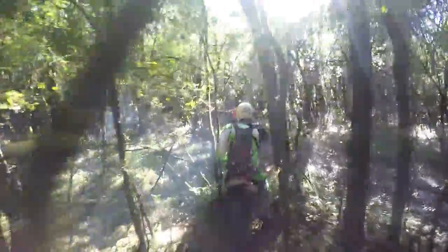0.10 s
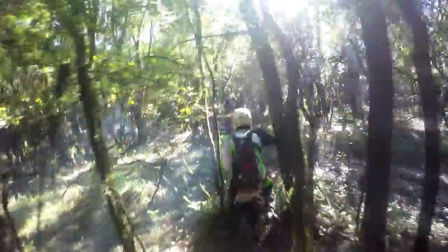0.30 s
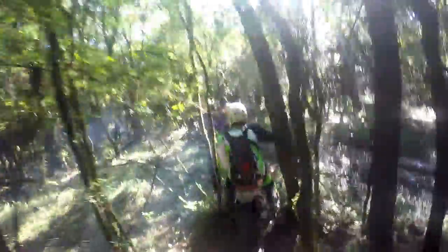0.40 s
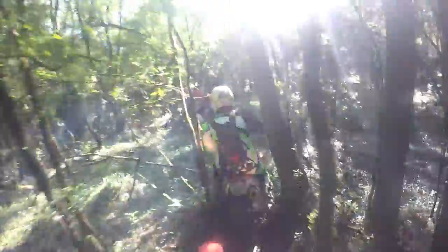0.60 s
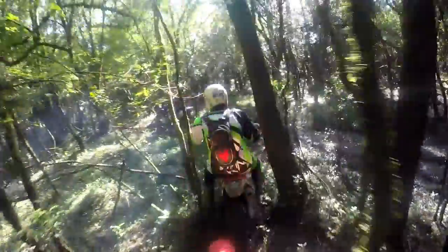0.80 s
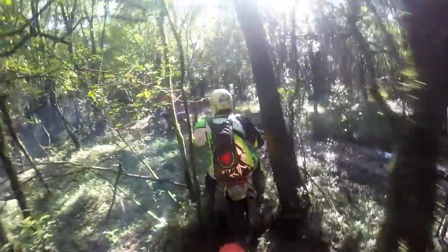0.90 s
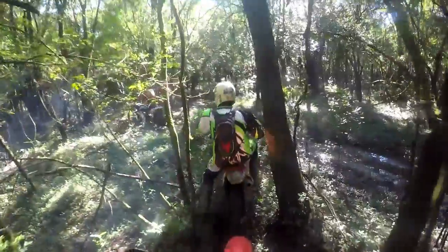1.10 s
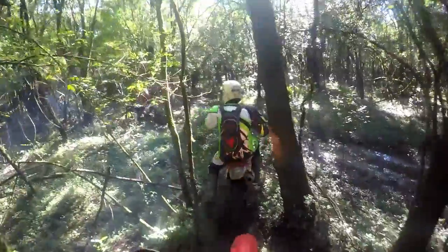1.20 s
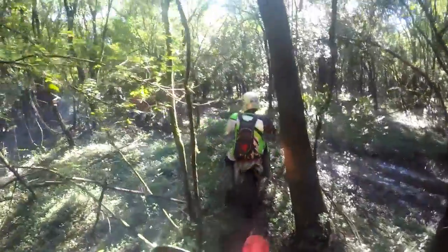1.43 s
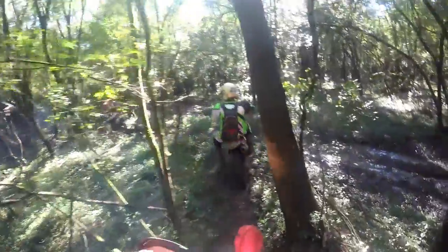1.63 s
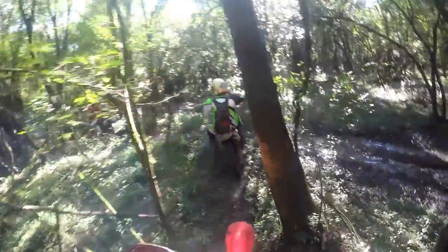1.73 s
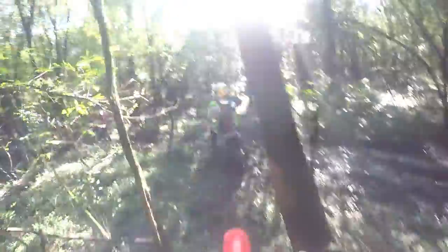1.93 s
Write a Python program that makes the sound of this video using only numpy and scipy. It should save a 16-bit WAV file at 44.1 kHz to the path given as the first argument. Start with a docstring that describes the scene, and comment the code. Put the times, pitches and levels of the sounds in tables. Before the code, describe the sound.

Close single-cylinder dirt bike engine revving three times in a wood, then settling to idle.

```python
"""In a wood, microphone at the rider's seat of a single-cylinder four-stroke trail bike.
The engine ticks over, gets three blips of throttle and sinks back to idle. Close by, every firing
thumps the silencer and sends a burst of gas ringing through the pipe; ground and trunks echo that bark.
Underneath are a dull knock from the engine case, the whirr of gears and chain, a faint gear whine,
twigs under the tyres and the low rumble of the moving bike."""
import sys
import numpy as np
from scipy import signal
from scipy.fft import rfft, irfft
from scipy.io import wavfile
from scipy.ndimage import uniform_filter1d

SR = 44100
rng = np.random.default_rng(int(sys.argv[2]) if len(sys.argv) > 2 else 0)


def materialize(psi):
    """Save the field psi as 16-bit PCM at rate SR to the path in sys.argv[1].

    A 1-D psi becomes a single channel; in a 2-D psi each row is a channel.
    """
    bounded = np.clip(np.atleast_2d(psi).T, -1, 1)
    quanta = np.round(bounded * 32767).astype(np.int16)
    wavfile.write(sys.argv[1], SR, quanta)


N = 85995
T = np.arange(N) / SR

# rumble of the moving bike (frequency [Hz], relative density [dB]) and (time [s], level [dB])
RUMBLE_SPECTRUM = [(15, -6.5), (30, -3), (70, 3), (120, -4.5), (200, -14.5), (320, -20), (600, -48),
                   (1500, -64)]
RUMBLE_DB = [(0, -36), (.2, -34.5), (.29, -31.5), (.38, -36.5), (.6, -30), (1.05, -30), (1.35, -28.5),
             (1.6, -31), (1.95, -38.5)]
# twigs and leaves under the tyres (frequency [Hz], relative density [dB]) and (time [s], level [dB])
TWIG_SPECTRUM = [(800, -25), (2500, 11.5), (4500, 7), (8200, -3), (12000, -11), (15500, -38)]
TWIG_DB = [(0, -48), (.35, -51), (1.3, -45), (1.5, -46.5), (1.68, -44), (1.95, -61)]
# gear whine as the bike rolls on (time [s], pitch [Hz], level [dB])
WHINE_GLIDE = [(1.35, 4350, -68), (1.52, 4364, -55), (1.595, 4110, -43.5), (1.66, 4110, -55),
               (1.8, 4010, -51), (1.95, 3800, -66)]
# whirr of gears and chain (frequency [Hz], relative density [dB]) and (time [s], level [dB])
WHIRR_SPECTRUM = [(200, -27), (330, 1.5), (520, -0.5), (780, -5), (1080, 5.5), (1300, -3), (1540, 7),
                  (1840, -0.5), (2100, 1), (2360, -11), (2740, 8), (3300, -8), (4500, -2.5), (5600, -13.5),
                  (8000, -15), (11000, -32), (15500, -26)]
WHIRR_DB = [(0, -45.5), (.4, -43.5), (.7, -35.5), (1.15, -40), (1.4, -41.5), (1.65, -42.5), (1.95, -43)]
# knock of the engine case (frequency [Hz], relative density [dB]) and (time [s], level [dB])
KNOCK_SPECTRUM = [(50, -24), (110, 7), (180, -0.5), (280, 4.5), (400, -20.5), (700, -66), (2000, -70)]
KNOCK_DB = [(0, -53.5), (.4, -38.5), (1.15, -40.5), (1.4, -43.5), (1.65, -43), (1.95, -47.5)]
# engine speed (time [s], firing rate [1/s])
FIRING_RATE = [(0.0, 24.81), (0.148, 24.19), (0.392, 27.51), (0.451, 20.54), (0.497, 24.44), (0.55, 24.77),
               (0.638, 30.3), (0.723, 36.35), (0.814, 44.69), (0.861, 42.86), (0.919, 37.33),
               (1.001, 43.89), (1.06, 48.07), (1.151, 39.14), (1.259, 33.91), (1.34, 38.11), (1.629, 19.98),
               (1.95, 19.99)]
# strength of the firings as the throttle opens and shuts (time [s], thump gain [dB], bark gain [dB])
THROTTLE_DB = [(0, -13.5, -30.5), (.125, -20.5, -22.5), (.39, -16, -34.5), (.435, -6.5, -18),
               (.48, -3.5, -10), (.522, -2.5, -12), (.563, 0, -6.5), (.6, 0, -5.5), (.634, -0.5, -7),
               (.666, 1, -5.5), (.696, 2.5, .5), (.725, 2.5, -1), (.75, 3, 0.5), (.824, 2.5, .5),
               (.845, 1.5, -3), (.868, -27, -33), (.892, 0, -10), (.918, -2.5, -12), (.944, 1, -5),
               (.969, 4, -1), (1.016, 3.5, 1), (1.06, 2.5, 0), (1.08, 2.5, -7), (1.102, -22, -39),
               (1.203, -10, -24.5), (1.23, -2, -11), (1.26, 0.5, -7), (1.316, 1.5, -5), (1.343, -1, -8.5),
               (1.37, -4.5, -19), (1.41, -18.5, -33), (1.95, -23.5, -28)]
# low modes of the silencer (frequency [Hz], base level [dB], decay [s], share of thump gain [dB/dB])
SILENCER_MODES = [(85.4, -18, 0.014, 0.41), (158, -19.5, 0.0062, 0.51), (255, -23, 0.0049, 1.07),
                  (368.4, -16, 0.0037, 2.05), (540, -22.5, 0.00094, 0.6)]
# resonances of pipe and bodywork
# (frequency [Hz], width [Hz], relative gain at low revs [dB], relative gain at high revs [dB])
PIPE_RESONANCES = [(931, 49, -4, -13), (1080, 135, -3, -2), (1184, 192, -0.5, 1), (1537, 240, -4, 5),
                   (1844, 285, -7, -1), (2032, 120, -4.5, -5.5), (2546, 290, -4, -11.5),
                   (2682, 205, -2.5, -3), (3460, 2550, -12, -12.5), (4740, 600, -8.5, -13),
                   (6010, 420, -18, -18), (7150, 280, -18.5, -20.5), (7910, 150, -19, -23),
                   (9640, 2300, -34.5, -36.5), (13100, 1900, -32, -45)]


def amp(db):
    return 10 ** (np.asarray(db) / 20)


def unit_rms(x):
    return x / np.sqrt(np.mean(x ** 2) + 1e-20)


def curve(table, t, column=1):
    """Reads one column of a table at the times t."""
    rows = np.array(table, float)
    return np.interp(t, rows[:, 0], rows[:, column])


def add(mix, start_s, sound):
    part = mix[max(round(start_s * SR), 0):][:len(sound)]
    part += sound[:len(part)]


def noise(spectrum):
    """Noise of rms 1 with the given spectrum."""
    hz, db = np.transpose(spectrum)
    gain = amp(np.interp(np.log(np.fft.rfftfreq(N, 1 / SR) + 1), np.log(hz + 1), db))
    return unit_rms(irfft(rfft(rng.standard_normal(N)) * gain, N))


def wobble(size):
    """Random drift of rms 1, smoothed over size samples."""
    return unit_rms(uniform_filter1d(uniform_filter1d(rng.standard_normal(N), size), size))


def whiten(burst, band_hz=1300):
    """Evens out the energy of a burst from band to band, leaving its fine grain."""
    spectrum = rfft(burst)
    power = uniform_filter1d(abs(spectrum) ** 2, max(int(band_hz * len(burst) / SR), 1))
    return irfft(spectrum / np.sqrt(abs(power) + 1e-12), len(burst))


def cycles():
    """Engine cycles completed at each moment, two turns of the crank apiece."""
    return np.cumsum(curve(FIRING_RATE, T)) / SR


def firing_times():
    """The cylinder fires at the start of each cycle."""
    completed = cycles()
    return np.interp(np.arange(int(completed[-1]) + 1), completed, T)


def bike_rumble():
    """The moving bike lays a bed of low noise under everything."""
    return noise(RUMBLE_SPECTRUM) * amp(curve(RUMBLE_DB, T))


def wood_echoes(source, patterns=4, t60_s=0.099, gap_s=.006, echoes_per_s=2000, change_hz=5):
    """Ground and trunks around the bike return thin echoes, whose patterns crossfade as it moves."""
    t, out = T[:SR // 2], np.zeros(N)
    for k in range(patterns):
        echoes = rng.standard_normal(len(t)) * (rng.random(len(t)) < echoes_per_s / SR)
        echoes *= amp(-60 * t / t60_s) * (t > gap_s)
        fade = np.cos(2 * np.pi * change_hz * (1 + k // 2) * T - k * np.pi / 2) * np.sqrt(2 / patterns)
        out += signal.fftconvolve(source * fade, echoes / np.linalg.norm(echoes))[:N]
    return out


def twigs(snaps_per_s=220, decay_s=.005, spread_db=1.8):
    """Down at the tyres, litter breaks in tiny random snaps."""
    snaps = rng.random(N) < snaps_per_s / SR
    strength = amp(spread_db * np.minimum(rng.exponential(1, N), 3))
    envelope = signal.lfilter([1], [1, -np.exp(-1 / (decay_s * SR))], snaps * strength)
    return noise(TWIG_SPECTRUM) * unit_rms(envelope) * amp(curve(TWIG_DB, T))


def gear_whine(width_hz=260):
    """A faint, fuzzy gear tone sinks as the bike slows."""
    pole = np.exp(-np.pi * width_hz / SR)
    white = rng.standard_normal(N) + 1j * rng.standard_normal(N)
    fuzz = signal.lfilter([1], np.poly([pole, pole]), white)
    tone = np.exp(2j * np.pi * np.cumsum(curve(WHINE_GLIDE, T)) / SR)
    return unit_rms((fuzz * tone).real) * amp(curve(WHINE_GLIDE, T, column=2))


def chain_whirr(pulse_depth=0.19, flutter_db=1):
    """Gears and chain hiss unevenly, swelling with each turn of the crank."""
    hiss = noise(WHIRR_SPECTRUM)
    pulsing = 1 + pulse_depth * np.cos(4 * np.pi * cycles())
    flutter = amp(flutter_db * wobble(size=130))
    return hiss * unit_rms(pulsing * flutter) * amp(curve(WHIRR_DB, T))


def case_knock(sharpness=1.4, lag_cycles=0.041):
    """Below the seat, the engine case knocks dully just after each firing."""
    swell = np.exp(sharpness * np.cos(2 * np.pi * (cycles() - lag_cycles)))
    return noise(KNOCK_SPECTRUM) * unit_rms(swell) * amp(curve(KNOCK_DB, T))


def silencer_thump(spread_db=.7, low_cut_hz=58.5, high_cut_hz=640):
    """Each firing kicks the low modes of the silencer, harder and brighter on an open throttle."""
    t, out = T[:SR // 10], np.zeros(N)
    for start_s in firing_times():
        throttle_db = curve(THROTTLE_DB, start_s)
        for hz, base_db, decay_s, share in SILENCER_MODES:
            gain = amp(base_db + share * throttle_db + spread_db * rng.standard_normal())
            add(out, start_s, gain * np.exp(-t / decay_s) * np.sin(2 * np.pi * hz * t))
    f = np.fft.rfftfreq(N, 1 / SR)
    band = f ** 2 / (f ** 2 + low_cut_hz ** 2) / np.sqrt(1 + (f / high_cut_hz) ** 10)
    return irfft(rfft(out) * band, N)


def pipe_response(column, size=4096):
    """How pipe and bodywork ring after an impulse, for one gain column of their table."""
    f = abs(np.fft.fftfreq(size, 1 / SR))
    power = sum(amp(row[column]) ** 2 / (1 + ((f - row[0]) / row[1] * 2) ** 2) ** 2
                for row in PIPE_RESONANCES)
    log_gain = np.log(power + 1e-10) / 2
    minimum_phase = np.exp(np.conj(signal.hilbert(log_gain)))
    return np.fft.ifft(minimum_phase).real[:size // 2]


def gas_burst(t, rise_s=.0006, decay_s=.003, tail_db=-13.5, tail_s=.012, crack_db=-17, crack_s=.0019):
    """One firing lets out a short jet of turbulent gas, with a crack just after its onset."""
    decay_s *= np.exp(.1 * rng.standard_normal())  # no two jets last equally long
    jet = (1 - np.exp(-t / rise_s)) * (np.exp(-t / decay_s) + amp(tail_db) * np.exp(-t / tail_s))
    burst = jet / np.linalg.norm(jet) * rng.standard_normal(len(t))
    add(burst, crack_s, -amp([crack_db]))
    return whiten(burst)


def exhaust_bark(base_db=-25, spread_db=.3, low_revs_hz=30.5, high_revs_hz=50.5):
    """Close to the microphone, each gas burst rings the pipe, whose colour shifts with the firing rate."""
    t, out = T[:SR // 10], np.zeros(N)
    slow_pipe, fast_pipe = pipe_response(column=2), pipe_response(column=3)
    for start_s in firing_times():
        revs = np.clip((curve(FIRING_RATE, start_s) - low_revs_hz) / (high_revs_hz - low_revs_hz), 0, 1)
        pipe = (1 - revs) * slow_pipe + revs * fast_pipe
        ring = signal.fftconvolve(gas_burst(t), pipe)[:len(t)]
        level_db = base_db + curve(THROTTLE_DB, start_s, column=2) + spread_db * rng.standard_normal()
        add(out, start_s, unit_rms(ring) * amp(level_db))
    return out


def scene():
    """The bike from the seat, in mono; only the bark echoes off the wood."""
    bark, rumble, thump = exhaust_bark(), bike_rumble(), silencer_thump()
    echoes = amp(-11.5) * wood_echoes(bark)
    machinery = case_knock() + chain_whirr() + gear_whine()
    return (rumble + echoes + twigs() + machinery + thump + bark)[None]


def record(dry):
    """The microphone's treble ends at 15.5 kHz."""
    low_pass = signal.firwin(255, 15500, window=("kaiser", 9), fs=SR)
    return signal.oaconvolve(dry, low_pass[None], "same")


dry = scene()
out = record(dry)
materialize(out)
```